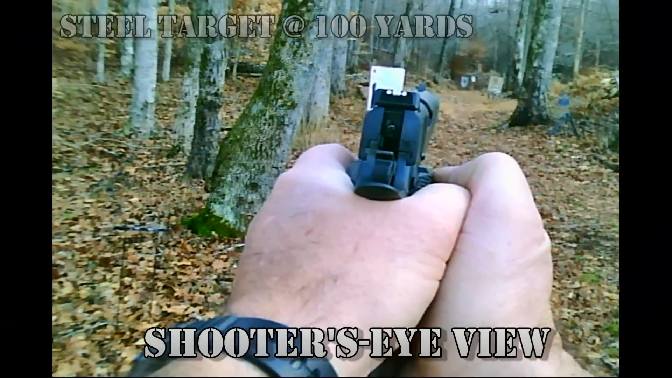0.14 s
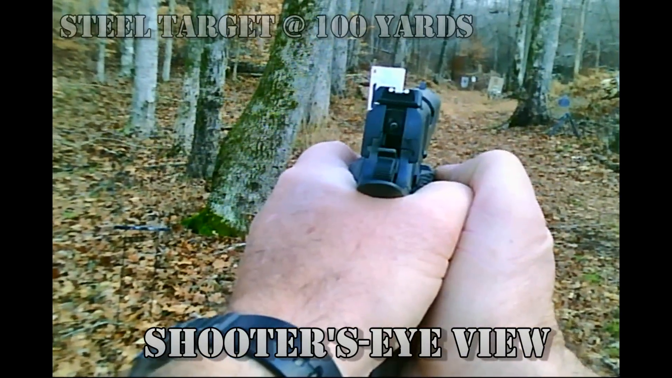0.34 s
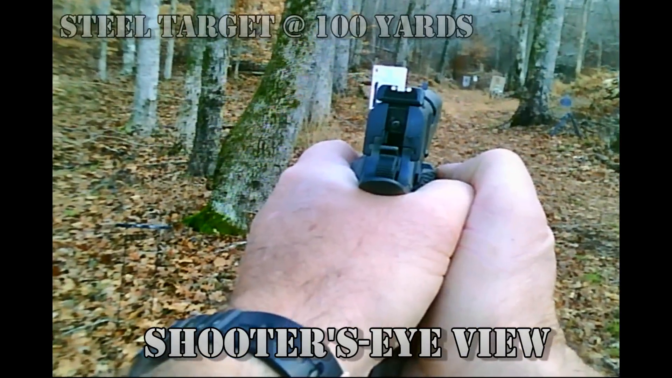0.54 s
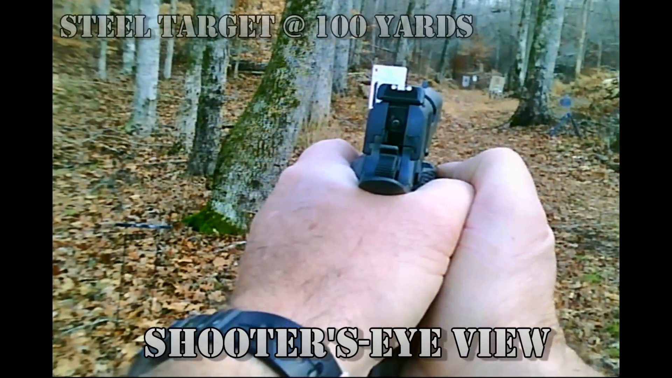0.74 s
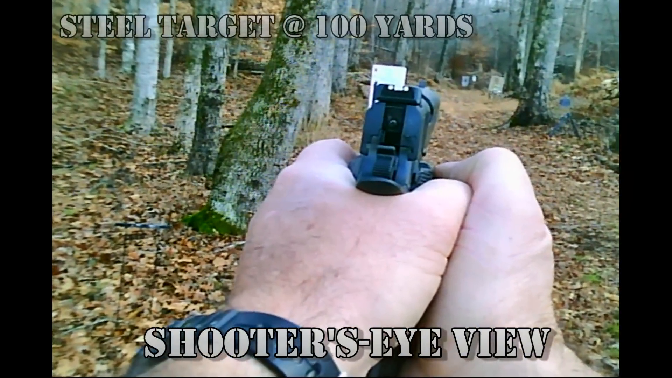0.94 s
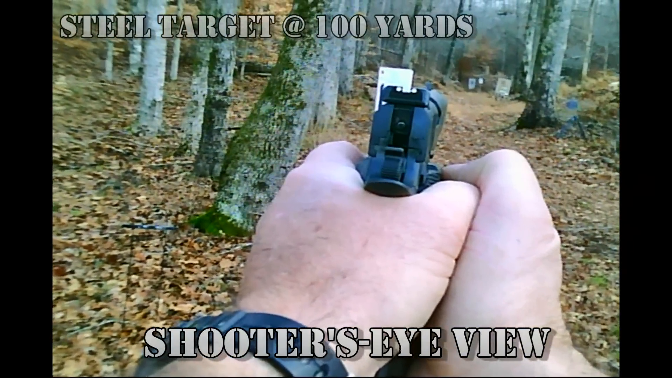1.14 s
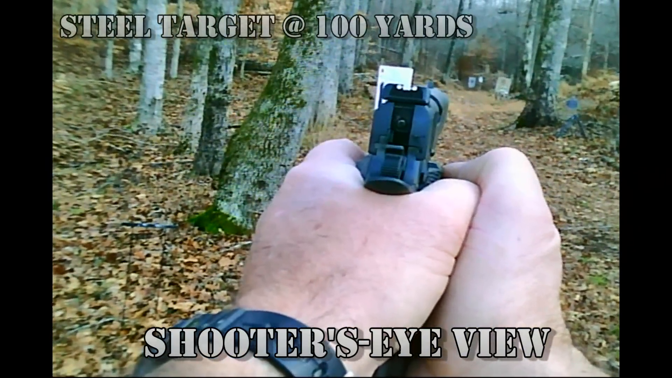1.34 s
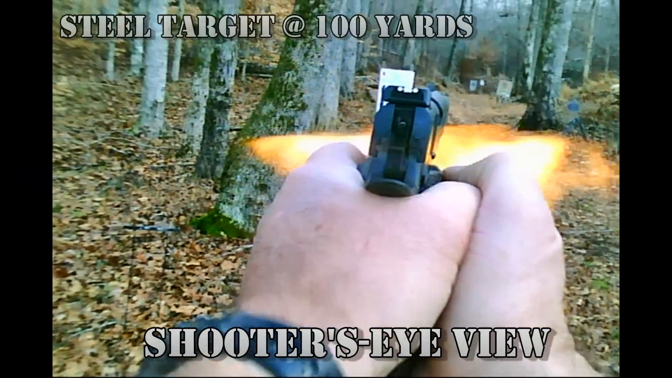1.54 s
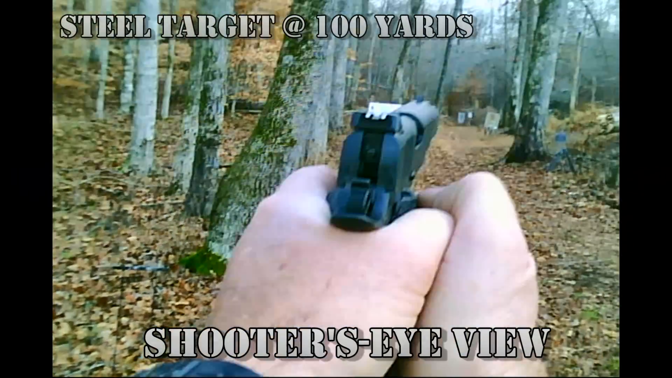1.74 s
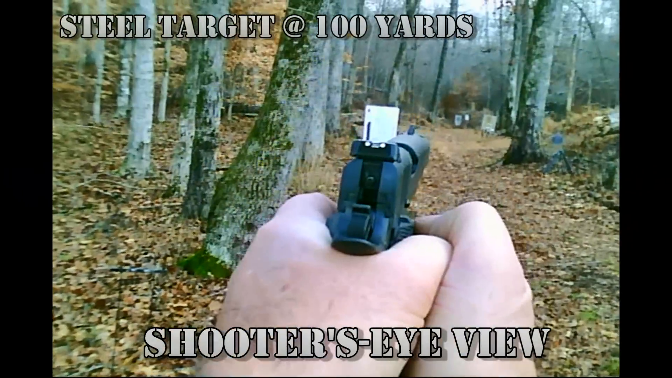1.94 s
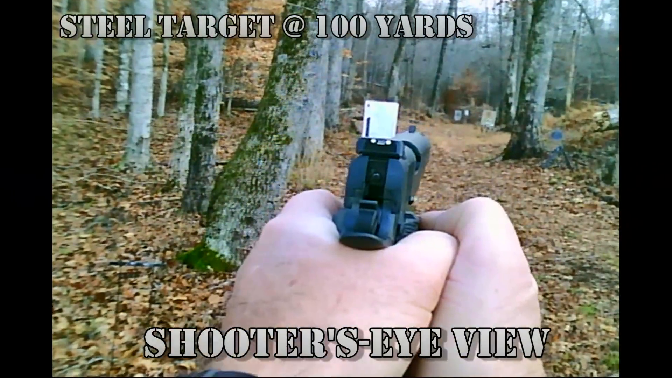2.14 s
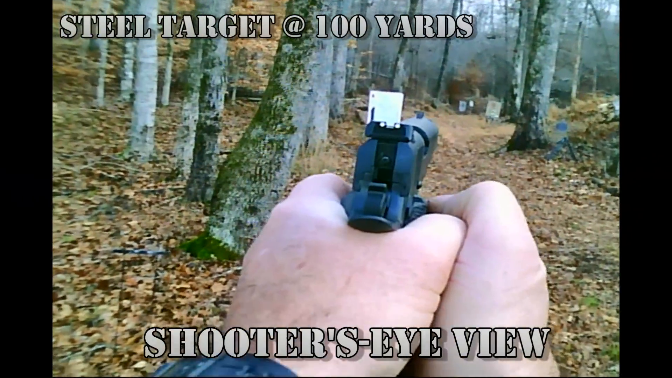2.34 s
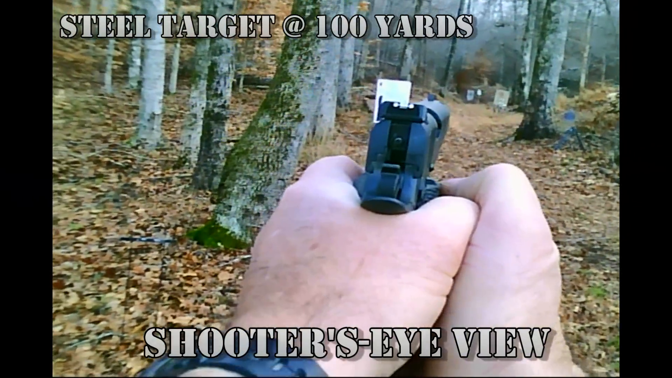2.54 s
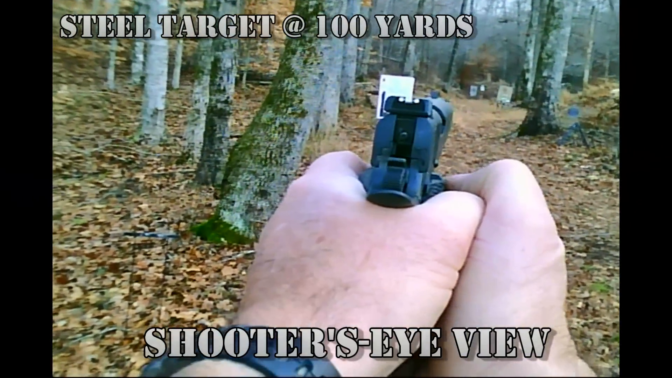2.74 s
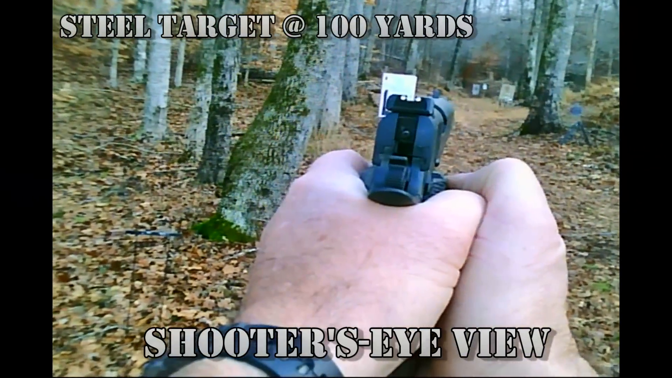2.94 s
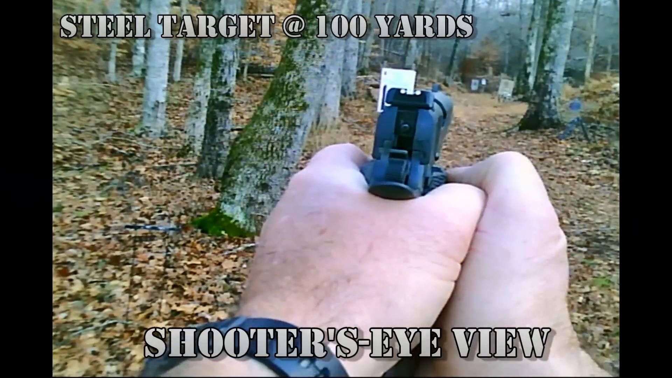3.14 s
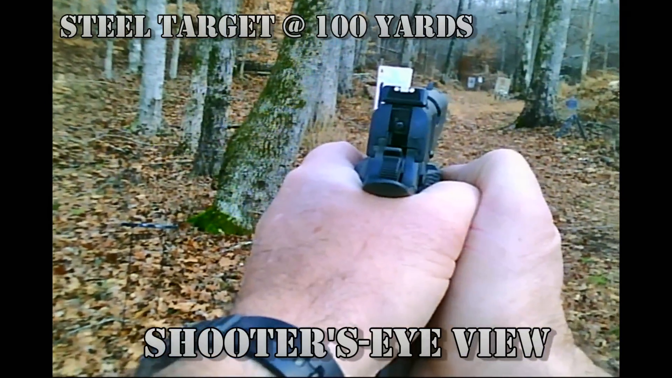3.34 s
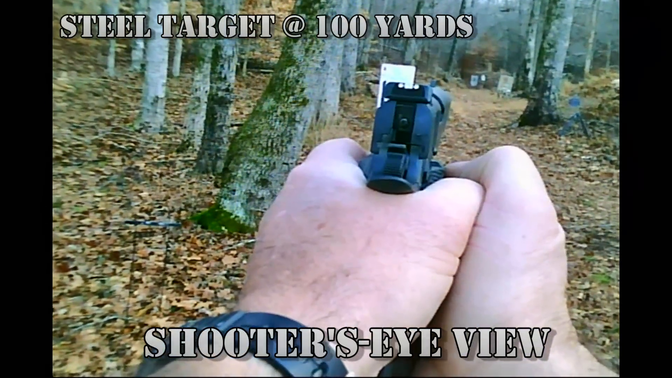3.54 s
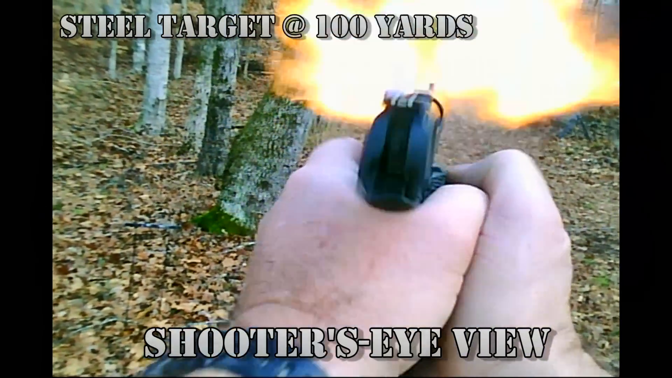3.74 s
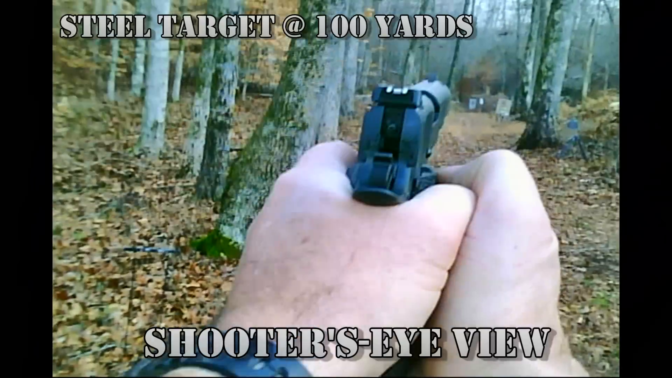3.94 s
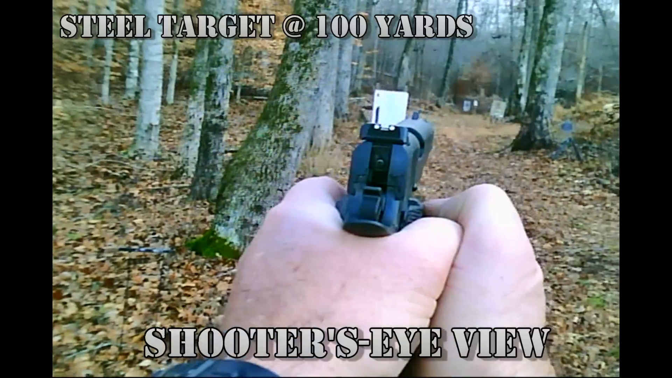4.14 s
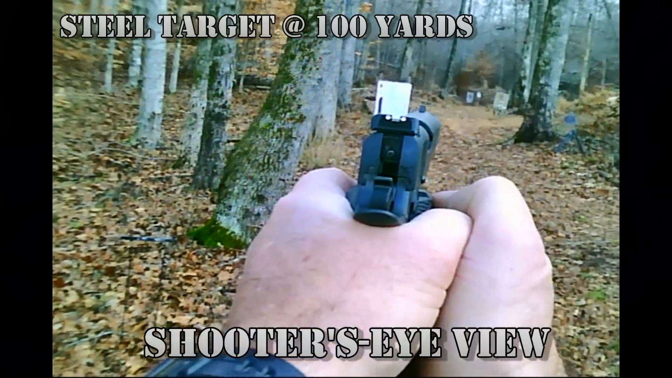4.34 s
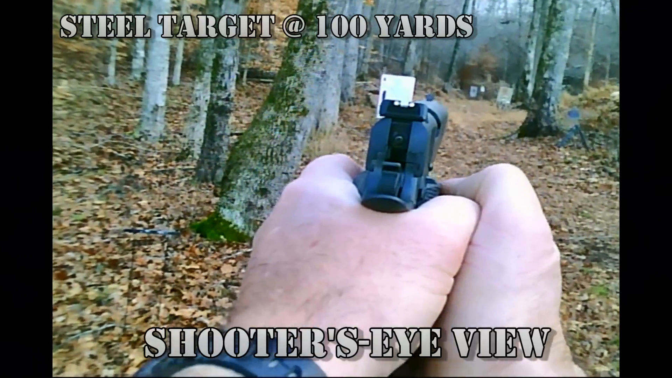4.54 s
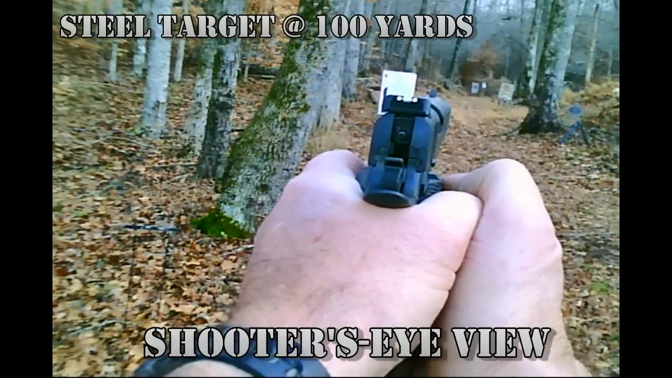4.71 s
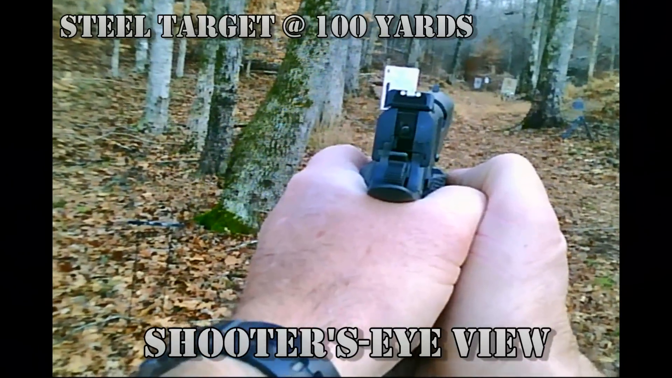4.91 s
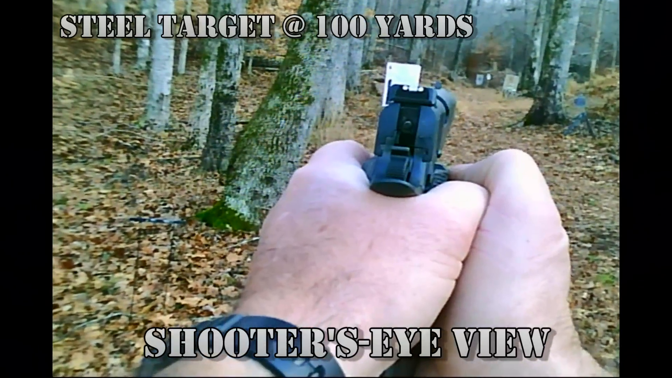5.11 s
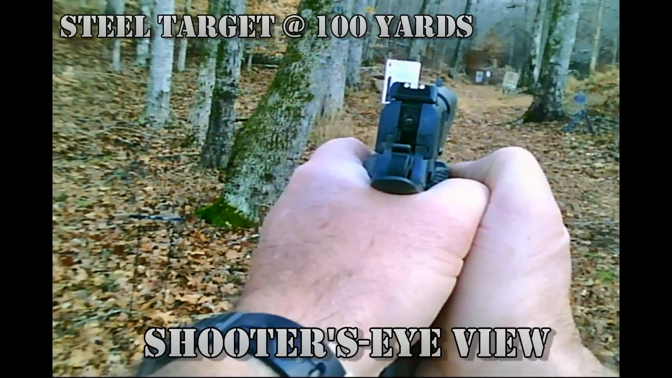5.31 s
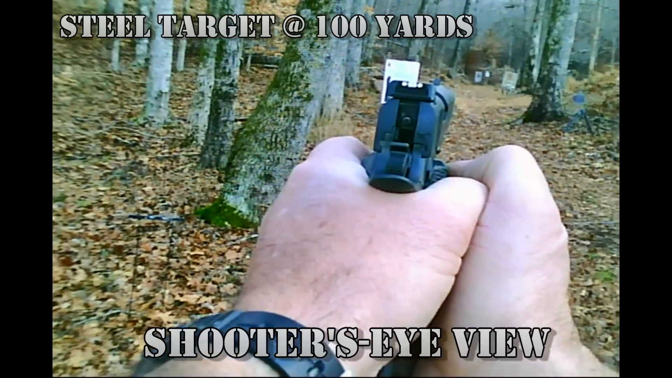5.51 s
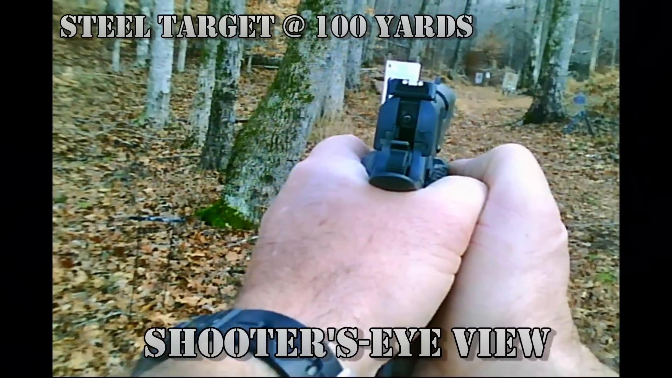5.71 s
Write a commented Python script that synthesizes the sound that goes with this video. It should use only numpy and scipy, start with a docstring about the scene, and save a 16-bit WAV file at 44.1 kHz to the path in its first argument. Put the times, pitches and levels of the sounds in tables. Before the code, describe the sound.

Over faint microphone hiss with a slight hum and whine, three loud, close handgun shots crack out at a slow, steady pace. Each blast distorts for an instant and echoes briefly among trees and off a hillside. A spent brass case drops quietly into dry leaves after the first and second shots. The microphone is right behind the gun, outdoors in still woodland.

```python
"""A faint hiss, hum and whine, then three pistol shots in a leafless wood, heard from behind the gun.
Each blast overloads the small microphone for about twenty milliseconds, then scatters back from
the tree trunks and rolls away off a hillside. After the first two shots, an empty brass case
drops into dry leaves with a tiny crackle."""
import sys
import numpy as np
from scipy import signal
from scipy.fft import rfft, irfft, next_fast_len
from scipy.io import wavfile

SR = 44100
rng = np.random.default_rng(int(sys.argv[2]) if len(sys.argv) > 2 else 0)


def unload_audio(sound):
    """Save the sound as a 16-bit wav file, at the path given as the first command line argument."""
    columns = np.transpose(np.atleast_2d(sound))
    # keep every value between -1 and 1, then stretch to whole-number steps
    steps = np.round(np.clip(columns, -1, 1) * 32767)
    wavfile.write(sys.argv[1], SR, steps.astype(np.int16))


N = 258867
TIME = np.arange(N) / SR
FREQS = np.maximum(np.arange(N // 2 + 1) * SR / N, 1)

# The three stages of a blast: how long after the shot each starts, and how long it holds.
CRACK_DELAY_S, CRACK_HOLD_S = 0.00074, 0.0027  # the crack at the muzzle
GAS_DELAY_S, GAS_HOLD_S = 0.0042, 0.0042  # the expanding gas
BOUNCE_DELAY_S, BOUNCE_HOLD_S = 0.0115, 0.0087  # bounces off the ground, shooter and nearest trunks

# The shots, and how strong each of their parts is:
# (time [s], blast gain [dB], echo gain [dB], gas push [dB], suction [dB], thump [dB])
PISTOL_SHOTS = [(1.553, -0.5, -1, -27.5, -14.5, -3), (3.7402, -1.5, -1.5, -6.5, -16, -17.5),
                (5.7712, -1.5, -1, -6.5, -5.5, -34)]
def blasts():
    """Each shot is too much for the microphone, which chokes and lets the sound through in spits."""
    crack = from_db(-0.5) * surge(CRACK_DELAY_S, CRACK_HOLD_S) * choked_noise(1600, 8800, share=0.45)
    gas = surge(GAS_DELAY_S, GAS_HOLD_S) * choked_noise(162, 1693.5, share=0.12)
    bounces = surge(BOUNCE_DELAY_S, BOUNCE_HOLD_S) * choked_noise(260, 5200, share=0.07)
    thud = surge(BOUNCE_DELAY_S, BOUNCE_HOLD_S, release_s=0.0035) * choked_noise(220, 218, share=0)
    # The microphone spits until the bounces have passed, then recovers.
    overload_s = BOUNCE_DELAY_S + BOUNCE_HOLD_S - GAS_DELAY_S
    spits = surge(GAS_DELAY_S, overload_s, release_s=0.002) * choked_noise(1900, 9264, share=0.4)
    return crack + gas + bounces + from_db(-12) * thud + from_db(-4) * spits


def surge(delay_s, hold_s, release_s=0.00012, attack_s=0.0004):
    """The loudness of one stage of every blast: it jumps up, holds and dies away."""
    loudness = np.zeros(N)
    for start, blast_db, *_ in PISTOL_SHOTS:
        age = TIME - start - delay_s
        rise = np.clip(age / attack_s + 0.5, 0, 1)
        fall = np.exp(-np.clip((age - hold_s) / release_s, 0, 20))
        loudness += from_db(blast_db) * rise * fall
    return loudness


def choked_noise(low_hz, high_hz, share, flicker_hz=4200, leak_db=-22):
    """Churning air makes a band of noise; the microphone chokes on it for a share of the time."""
    band = 1 / np.sqrt((1 + (low_hz / FREQS) ** 2) * (1 + (FREQS / high_hz) ** 4))
    passing = np.interp(TIME * flicker_hz, np.arange(N), rng.random(N) > share)
    return np.maximum(passing, from_db(leak_db)) * noise(band)


def pressure_swing(recovery_db=-15, thump_hz=128, thump_s=0.008):
    """The gas pushes, thumps and sucks back; the overloaded input swings slowly back to rest."""
    out = np.zeros(N)
    for start, _, _, push_db, suction_db, thump_db in PISTOL_SHOTS:
        gas_start = start + GAS_DELAY_S
        low_tone = np.sin(2 * np.pi * thump_hz * (TIME - gas_start))
        out += from_db(push_db) * swell(gas_start, rise_s=0.0015)
        out += from_db(thump_db) * burst(gas_start, thump_s) * low_tone
        out -= from_db(suction_db) * swell(start + 0.016, rise_s=0.0028)
        out += from_db(recovery_db) * swell(start + 0.026, rise_s=0.031)
    return out


def echoes():
    """The shooter stands still, so the wood and the hillside answer every shot the same way."""
    answer = trunk_echoes() + hillside_roll()
    return sum(from_db(echo_db) * np.pad(answer, (int(start * SR), 0))[:N]
               for start, _, echo_db, *_ in PISTOL_SHOTS)


# Big trunks whose echoes stand out from the rest: (delay after the shot [s])
BIG_TRUNK_DELAYS = [.0327, .0543, .0620, .0777, .0975, .2342]
# The tone of the sound the trees send back: (frequency [Hz], relative level [dB])
TRUNK_TONE = [(50, -1), (120, 1.5), (250, -1), (420, -1.5), (700, 2), (1350, 2.5), (1800, -1), (2500, -7.5),
              (3400, -7), (4300, -13.5), (7000, -19), (10000, -23.5), (13000, -27), (16000, -42)]
def trunk_echoes(level_db=-4.5, big_db=6, big_width_s=0.0017, build_s=0.028, near_s=0.037):
    """Countless trunks send a shot back, weaker from farther away; bass and treble fade first."""
    big_echoes = sum(np.exp(-np.minimum(((TIME - delay) / big_width_s) ** 2, 20))
                     for delay in BIG_TRUNK_DELAYS)
    build_up = np.minimum(TIME / build_s, 1) ** 4
    distance_fade = (1 + TIME / near_s) ** -1.765
    size = next_fast_len(N)
    spectrum = rfft(noise(tone_gain(TRUNK_TONE) * ground_reflection()), size)
    hz = np.maximum(np.arange(size // 2 + 1) * SR / size, 1)
    centres_hz = np.geomspace(110, 15000, 12)
    scattered = np.zeros(N)
    for centre, this_band in zip(centres_hz, np.eye(len(centres_hz))):  # each band fades at its own rate
        band_gain = np.interp(np.log(hz), np.log(centres_hz), this_band)
        band = irfft(spectrum * band_gain, size)[:N]
        scattered += band * from_db(-loss_db_per_s(centre) * TIME)
    return from_db(level_db + big_db * big_echoes) * build_up * distance_fade * scattered


def loss_db_per_s(hz, everywhere=5.5):
    """The wood soaks up a little of every pitch; soft ground takes more bass, and air more treble."""
    ground = 24 / (1 + (hz / 246) ** 6)
    air = 10 * (hz / 5500) ** 1.6
    return everywhere + ground + air


def ground_reflection(lag_s=0.00076, strength=0.45, rough_hz=3700):
    """Sound meets its upside-down copy off the ground, which weakens evenly spaced frequencies."""
    reflection = strength / (1 + (FREQS / rough_hz) ** 4)  # rough leaf litter blurs this in the treble
    return np.abs(1 - reflection * np.exp(-2j * np.pi * FREQS * lag_s))


def hillside_roll(level_db=-43, delay_s=0.18, rise_s=0.074, low_hz=60, high_hz=1700):
    """The rising ground ahead of the shooter returns a shot as one soft, dull roll."""
    dull_band = 1 / np.sqrt((1 + (FREQS / high_hz) ** 4) * (1 + (low_hz / FREQS) ** 4))
    return noise(ground_reflection() * dull_band, from_db(level_db) * swell(delay_s, rise_s))


# The crackles of cases landing: (time [s], level [dB], fade time [s])
CASE_LANDINGS = [(1.974, -45, 0.0012), (2, -55, 0.044), (4.166, -50, 0.0036), (4.189, -45, 0.0045),
                 (4.1960, -49.5, 0.014)]
# The tone of dry leaves: (frequency [Hz], relative level [dB])
LEAF_TONE = [(1500, -15), (3200, 9), (5000, -0.5), (7800, -4), (9500, -22), (15000, -31)]
def falling_cases():
    """Empty brass cases drop into dry leaves with short crackles."""
    crackles = sum(from_db(db) * burst(start, fade_s) for start, db, fade_s in CASE_LANDINGS)
    return noise(tone_gain(LEAF_TONE), crackles)


# The tone of the steady hiss: (frequency [Hz], relative level [dB])
HISS_TONE = [(10, -1), (28, -7.5), (42, -12.5), (70, -10.5), (100, -19), (160, -20), (350, -27),
             (850, -26.5), (1500, -31.5), (3000, -34), (9000, -36.5), (12500, -45.5), (16000, -62.5)]
# The pure notes in the low hum: (frequency [Hz], average level [dB])
HUM_NOTES = [(28.5, -65), (57, -80), (85.5, -87)]
# The pure notes in the thin electronic whine: (frequency [Hz], average level [dB])
WHINE_NOTES = [(1200, -85.5), (3892, -80.5), (5599, -88.5), (7402, -89.5), (9598, -87.5)]
def background(hiss_db=-65.5):
    """Still air and the camera's own hiss, with its low hum and faint whine."""
    notes = sum(from_db(db) * np.sqrt(2) * np.sin(2 * np.pi * (hz * TIME + rng.random()))
                for hz, db in [*HUM_NOTES, *WHINE_NOTES])
    return from_db(hiss_db) * noise(tone_gain(HISS_TONE)) + notes


def from_db(db):
    """Turn decibels into a number to multiply a sound by."""
    return 10 ** (np.asarray(db) / 20)


def tone_gain(table):
    """Join the points of a tone table into a gain for every frequency."""
    hz, db = np.array(table).T
    return from_db(np.interp(np.log(FREQS), np.log(hz), db))


def noise(gain, loudness=1):
    """Noise that follows a loudness curve; the gain changes its tone but not its overall level."""
    size = next_fast_len(N)
    tone = np.interp(np.arange(size // 2 + 1) * SR / size, FREQS, gain)
    tone /= np.sqrt(np.mean(tone ** 2) + 1e-20)
    white = loudness * rng.standard_normal(N)
    return irfft(rfft(white, size) * tone, size)[:N]


def burst(start, fade_s):
    """A curve that starts suddenly and fades away."""
    return (TIME >= start) * np.exp(-np.clip((TIME - start) / fade_s, 0, 60))


def swell(start, rise_s):
    """A smooth curve that climbs to one in its rise time, then sinks."""
    progress = np.clip((TIME - start) / rise_s, 0, 60)
    return progress * np.exp(1 - progress)


def scene():
    """Everything that reaches the one microphone."""
    return (blasts() + pressure_swing() + echoes() + falling_cases() + background())[None]


def record(dry, offset=-0.0078, ceiling=0.86, treble_hz=11900, cutoff_hz=15800):
    """The input sits slightly off centre and squashes loud peaks; the treble fades and the top is cut."""
    off_centre = dry + offset
    squashed = ceiling * off_centre / (ceiling ** 4 + off_centre ** 4) ** (1 / 4)
    softened = signal.sosfilt(signal.butter(4, treble_hz, fs=SR, output="sos"), squashed)
    return signal.sosfilt(signal.ellip(10, 0.1, 80, cutoff_hz, fs=SR, output="sos"), softened)


dry = scene()
out = record(dry)
unload_audio(out)
```